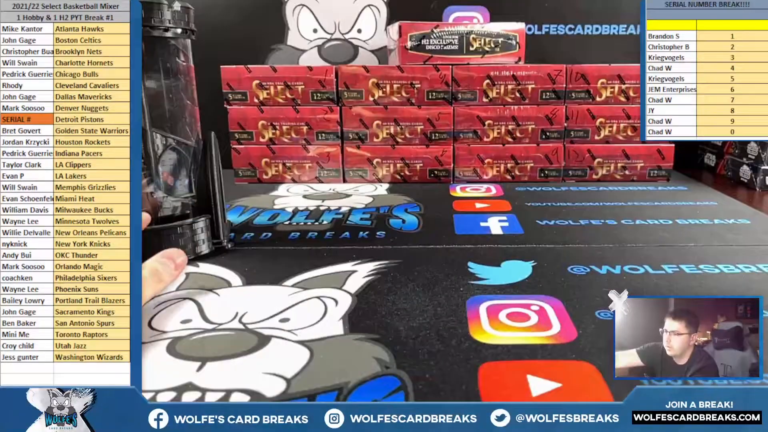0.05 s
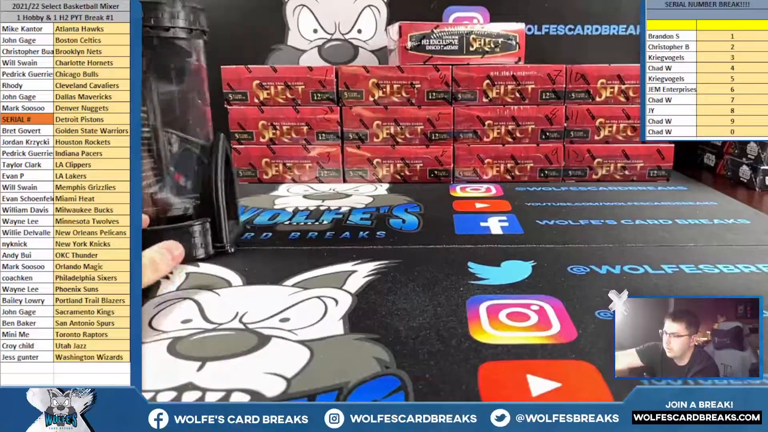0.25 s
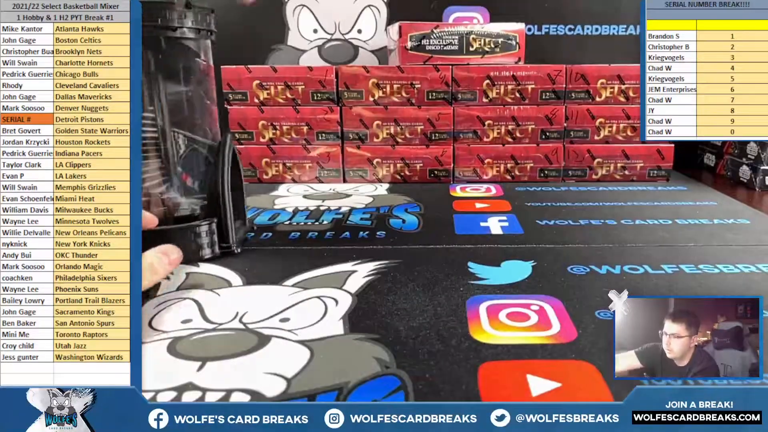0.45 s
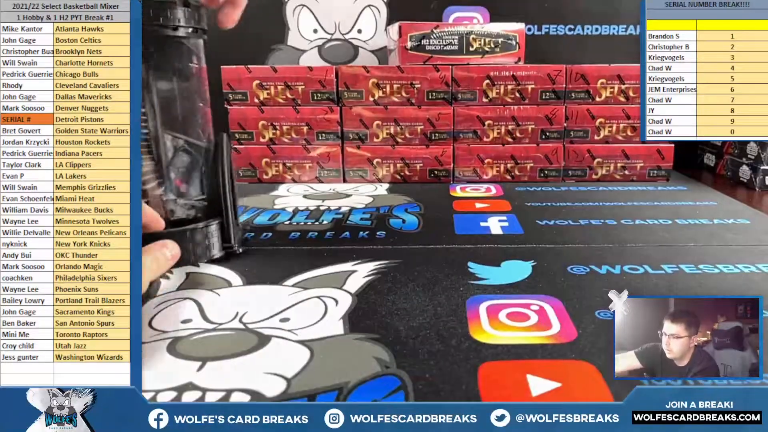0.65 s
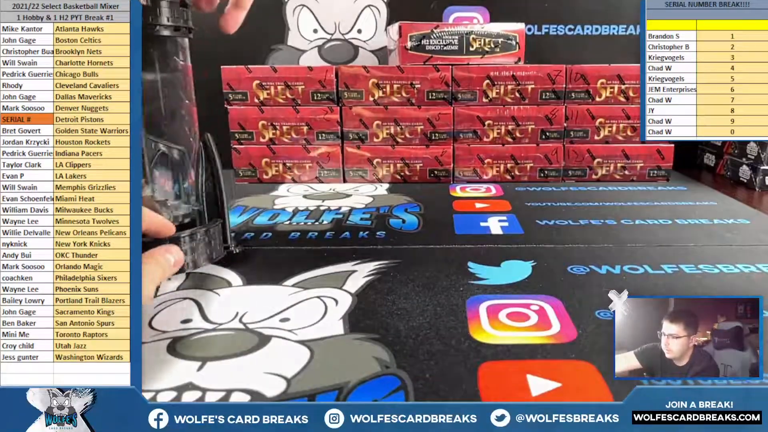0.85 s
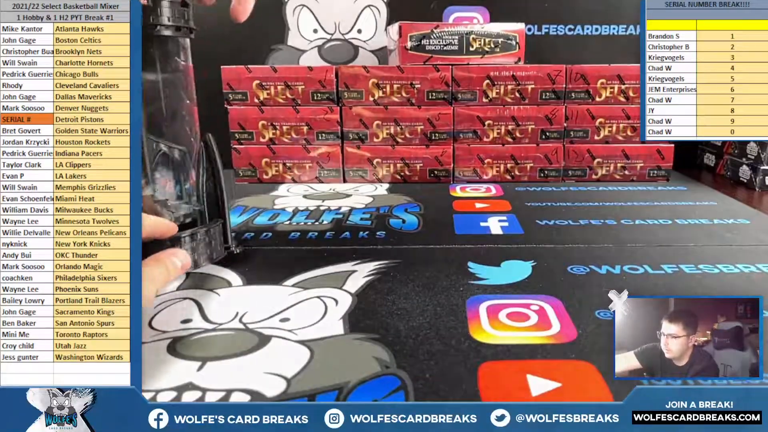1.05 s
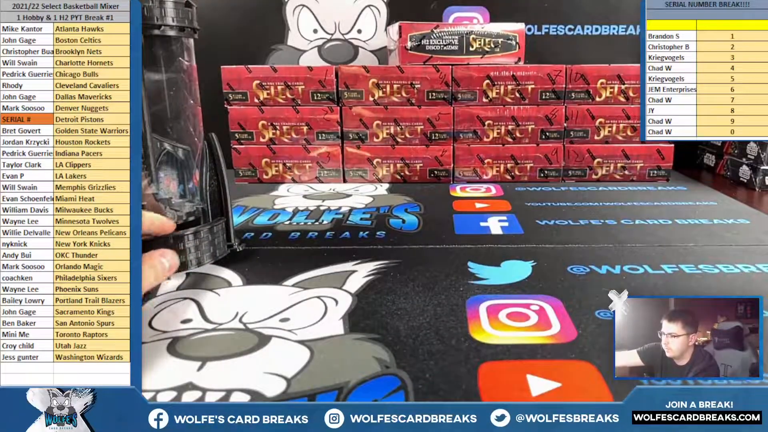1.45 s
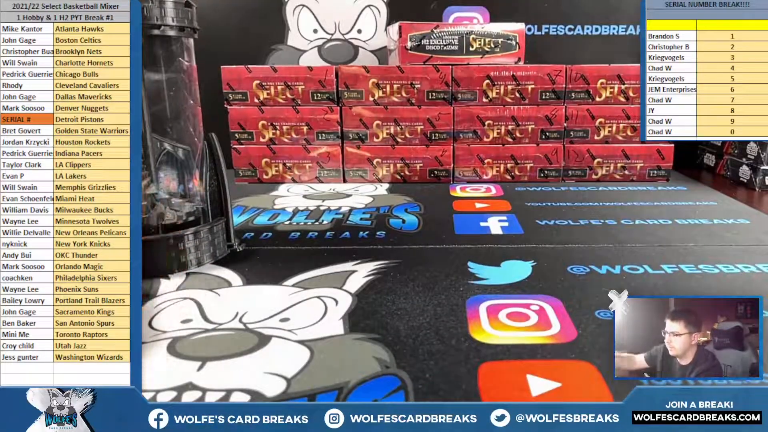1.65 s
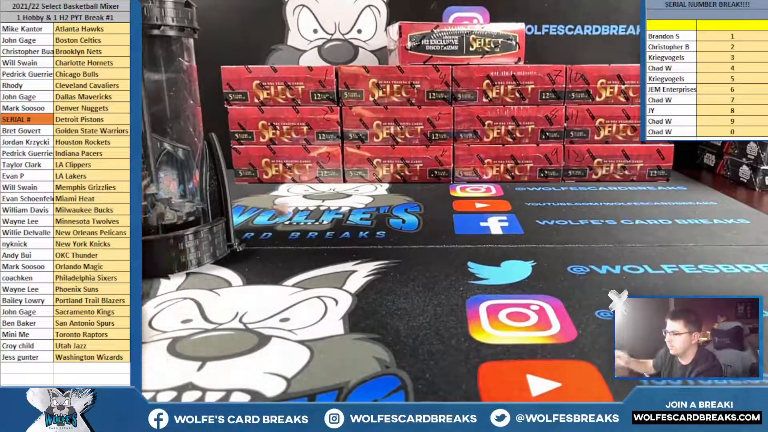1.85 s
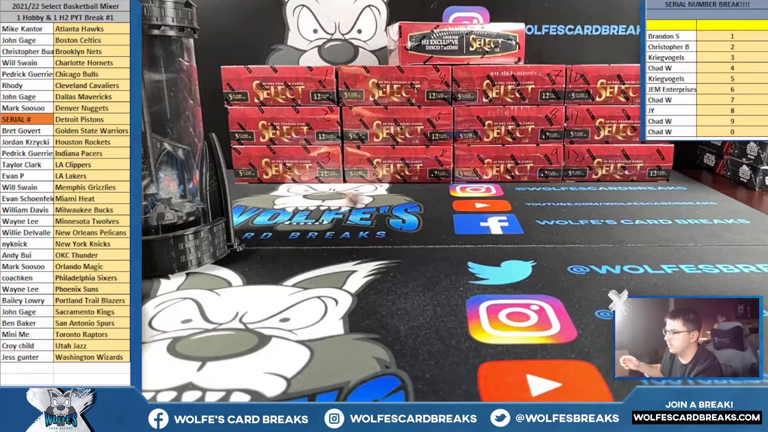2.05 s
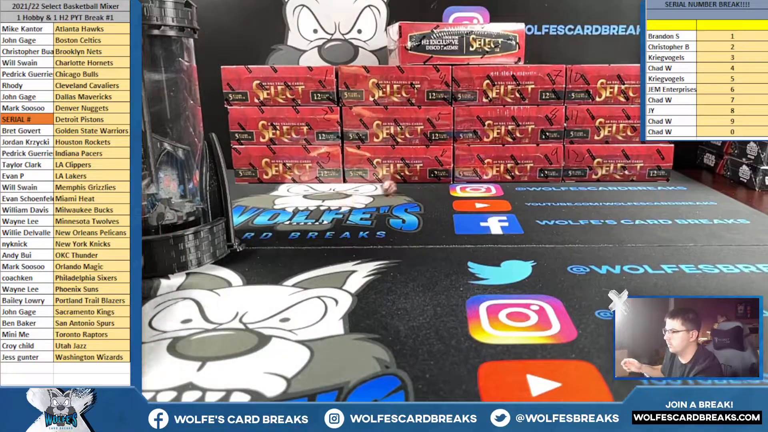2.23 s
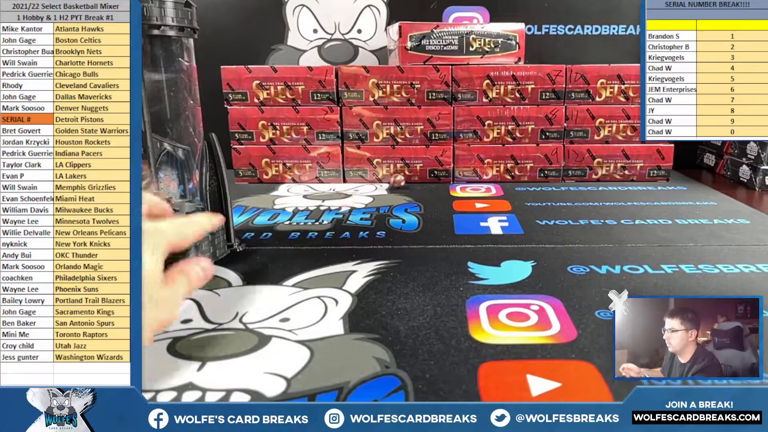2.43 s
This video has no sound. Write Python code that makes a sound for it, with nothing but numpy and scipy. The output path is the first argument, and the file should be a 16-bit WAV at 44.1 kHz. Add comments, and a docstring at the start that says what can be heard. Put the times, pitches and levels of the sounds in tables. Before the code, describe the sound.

In a small room with quiet, low background noise, one die clatters down a plastic dice tower close to the microphone. Soft finger and sleeve movements and two little taps come first. The fall is a quick run of hard, hollow knocks lasting about half a second, ending in a sharp double clack in the tray. Muffled bounces on a desk mat follow, then faint clicks and arm movement.

```python
"""Die through a dice tower

A die drops into a tall plastic tower on a desk in a small room. It knocks from baffle to baffle,
ringing the walls and the air in the shaft, cracks into the tray, then tumbles to rest on a soft mat.
Fingers rub and tap, an arm shifts, a sleeve brushes faintly; the room rumbles low."""
import sys
import numpy as np
from scipy import signal
from scipy.fft import rfft, irfft, next_fast_len
from scipy.io import wavfile

SR = 44100
rng = np.random.default_rng(int(sys.argv[2]) if len(sys.argv) > 2 else 0)


def put_to_file(sound):
    """Save the sound as 16-bit audio at rate SR, in the file named by the first command-line argument."""
    columns = np.atleast_2d(sound).T  # one column per channel
    safe = np.clip(columns, -1, 1)
    whole_steps = np.round(safe * 32767)
    wavfile.write(sys.argv[1], SR, whole_steps.astype(np.int16))


N = 109809
TIME_S = np.arange(N) / SR
AGE_S = TIME_S[:SR // 3]   # time since a contact
DROP_S, TRAY_S = 1.194, 1.627   # die meets the first baffle, reaches the tray


def from_db(db):
    return 10 ** (np.asarray(db) / 20)


def rms_one(x):
    return x / np.sqrt(np.mean(x ** 2) + 1e-20)


def at_hz(points, hz):
    """Interpolate (Hz, value) points over log frequency."""
    known_hz, values = np.transpose(points)
    return np.interp(np.log(hz + 1), np.log(known_hz), values)


def coloured(x, spectrum):
    """Minimum-phase filter through (Hz, dB) points."""
    size = 2 * next_fast_len(len(x))
    bin_hz = np.arange(size // 2 + 1) * SR / size
    cepstrum = irfft(np.log(from_db(at_hz(spectrum, bin_hz))))
    cepstrum[1:size // 2] *= 2
    cepstrum[size // 2 + 1:] = 0
    return irfft(rfft(x, size) * np.exp(rfft(cepstrum)))[:len(x)]


def noise(spectrum, size=len(AGE_S)):
    """Unit-rms noise shaped by (Hz, dB) points; one contact long by default."""
    return rms_one(coloured(rng.standard_normal(size), spectrum))


def fade(t60_s):
    return from_db(-60 * AGE_S / t60_s)


def onset(rise_s):
    return 1 - np.exp(-AGE_S / rise_s)


def ring(modes, spread_db, detune):
    """Struck modes. The spot hit sets strength and sign, and picks among close neighbours."""
    out = 0
    for (hz, db, t60_s), (loud, sharp, side) in zip(modes, rng.standard_normal((len(modes), 3))):
        gain = np.sign(side) * from_db(db + spread_db * loud)
        out = out + gain * np.sin(2 * np.pi * hz * (1 + detune * sharp) * AGE_S) * fade(t60_s)
    return out


def add(track, start_s, sound):
    start = round(start_s * SR)
    track[start:start + len(sound)] += sound[:N - start]


def swells(rows, attack_s, release_s, sag_db_per_s=0):
    """Gain curve: each swell rises to its peak, holds or sags, then dies. Overlaps add in power."""
    power = np.zeros(N)
    for peak_s, hold_s, db in rows:
        age_s = np.maximum(TIME_S - peak_s, 0)
        rise = np.exp(np.minimum(TIME_S - peak_s, 0) / attack_s)
        release = np.exp(-np.maximum(age_s - hold_s, 0) / release_s)
        power += (from_db(db - sag_db_per_s * age_s) * rise * release) ** 2
    return np.sqrt(power)


# Room noise. Each row: frequency in Hz, relative density in dB.
AMBIENCE_SPECTRUM = [(20, 9.5), (40, -15.5), (100, -6), (170, -10), (300, -15), (500, -16.5), (1000, -22.5),
                     (2500, -27), (4000, -36.5), (9000, -40), (16000, -42)]
# Swells of the rumble. Each row: peak time in seconds, hold in seconds, level in dB.
RUMBLE_RISES = [(.65, 0.15, -57.5), (1.22, 1.15, -57.5), (1.86, 0.074, -54)]


def background(rumble_hz, waver_hz, rumble_floor_db, ambience_db):
    """Steady room noise and a low rumble that wavers in pitch and level."""
    waver = noise([(8, -8), (25, -25), (100, -90)], N)
    rumble = np.sqrt(2) * np.sin(2 * np.pi * np.cumsum(rumble_hz + waver_hz * waver) / SR)
    rumble *= np.hypot(from_db(rumble_floor_db), swells(RUMBLE_RISES, attack_s=0.02, release_s=0.12))
    flutter_db = 2.2 * noise([(8, -9.5), (25, -17), (100, -82)], N)
    return from_db(ambience_db) * noise(AMBIENCE_SPECTRUM, N) + rumble * from_db(flutter_db)


# Room decay. Each row: frequency in Hz, T60 in seconds.
ROOM_DECAY = [(100, 0.5), (500, 0.3), (1500, 0.37), (3000, 0.34), (6000, 0.36), (14000, 0.17)]


def room_reflections(x, wet_db, build_s):
    """Diffuse reflections, dying faster in the treble."""
    edges_hz = np.geomspace(80, 17000, num=10)
    tail = 0
    for low, high in zip(edges_hz, edges_hz[1:]):
        bandpass = signal.butter(2, [low, high], "band", fs=SR, output="sos")
        band = signal.sosfilt(bandpass, rng.standard_normal(len(AGE_S)))
        tail = tail + band * fade(at_hz(ROOM_DECAY, np.sqrt(low * high)))
    tail *= np.clip(AGE_S / build_s - 0.5, 0, 1)
    tail /= np.sqrt(np.sum(tail ** 2))
    tail = coloured(tail, [(150, 5), (450, -3), (1200, -4.5), (5000, -2), (9000, -5.5), (12000, -6)])
    return from_db(wet_db) * signal.fftconvolve(x, tail)[:N]


# Finger strokes. Each row: peak time in seconds, hold in seconds, level in dB.
FINGER_RUBS = [(0.0022, 0.3, -65.5)]
# Rubbed plastic. Each row: frequency in Hz, bandwidth in Hz, relative level in dB.
RUB_RESONANCES = [(1330, 65, 0.5), (1600, 260, -5), (3400, 300, -8)]


def finger_rub():
    """Skin friction stirs the tower's resonances."""
    friction = rng.standard_normal(N)
    rub = 0
    for hz, width_hz, db in RUB_RESONANCES:
        rub = rub + from_db(db) * signal.lfilter(*signal.iirpeak(hz, hz / width_hz, fs=SR), friction)
    return rms_one(rub) * swells(FINGER_RUBS, attack_s=0.03, release_s=0.059, sag_db_per_s=21)


# Arm movements. Each row: peak time in seconds, hold in seconds, level in dB.
ARM_SHIFTS = [(.1, 0.19, -78), (.59, 0.023, -67), (.78, 0.086, -61.5), (1.95, .3, -67), (2.29, .2, -63.5)]
# Arm on desk. Each row: frequency in Hz, relative density in dB.
ARM_SPECTRUM = [(50, -24.5), (120, 3.5), (200, -1.5), (290, 0), (430, -2.5), (650, -13.5), (1500, -16),
                (5000, -52.5)]


def arm_on_desk(rest_db):
    """Dull noise that swells as the arm shifts on the desk."""
    moving = swells(ARM_SHIFTS, attack_s=0.036, release_s=0.023)
    return np.hypot(from_db(rest_db), moving) * noise(ARM_SPECTRUM, N)


# Sleeve movements. Each row: peak time in seconds, hold in seconds, level in dB.
SLEEVE_SWISHES = [(0.13, 0.14, -67), (.61, 0.22, -60), (1.05, .2, -72), (2.475, .02, -65)]
# Brushing cloth. Each row: frequency in Hz, relative density in dB.
CLOTH_SPECTRUM = [(200, 1), (1000, -3), (2500, 6), (4200, 1), (6200, 4.5), (9000, 1.5), (13000, -1),
                  (16000, -12.5)]


def sleeve(rest_db):
    """Cloth swishes, and stirs faintly while the hand holds the die."""
    holding = from_db(rest_db) * (TIME_S < DROP_S)
    moving = swells(SLEEVE_SWISHES, attack_s=0.066, release_s=0.015, sag_db_per_s=19.5)
    return np.hypot(holding, moving) * noise(CLOTH_SPECTRUM, N)


# Taps on tower and desk. Each row: start in seconds, touch level in dB, click level in dB.
LIGHT_TAPS = [(0.773, -56, -57), (0.817, -61.5, -54), (1.935, -54.5, -68), (2.003, -60.5, -63),
              (2.119, -75, -58), (2.246, -69, -57), (2.404, -54, -61), (2.417, -55.5, -66)]
# Soft contact, for taps and mat. Each row: frequency in Hz, relative density in dB.
THUD_SPECTRUM = [(60, -11), (300, -0.5), (600, -2), (1000, -5), (1500, -14.5), (3000, -13.5), (8000, -33),
                 (16000, -51)]


def light_taps():
    """Short dull touches and small clicks, from the settling die and the hand."""
    out = np.zeros(N)
    click_spectrum = [(800, -24), (1700, 8), (2500, 11), (3200, -3), (4200, -36), (12000, -53)]
    for start_s, touch_db, click_db in LIGHT_TAPS:
        touch = from_db(touch_db) * noise(THUD_SPECTRUM) * fade(t60_s=0.1)
        click = from_db(click_db) * noise(click_spectrum) * fade(t60_s=0.029)
        add(out, start_s, (touch + click) * onset(rise_s=0.0022))
    return out


# Die on the mat. Each row: start in seconds, strength in dB.
MAT_BOUNCES = [(1.7512, -36), (1.7747, -41), (1.847, -41.5), (1.934, -51.5), (1.9610, -61)]
# Desk under the mat. Each row: frequency in Hz, relative level in dB, T60 in seconds.
DESK_RESONANCES = [(68, -10.5, 0.89), (188, -18, 0.13), (332.5, -11, 0.2), (412, -11, 0.19),
                   (574, -4.5, 0.19), (608, -7.5, 0.16), (881, 6.5, 0.042)]


def mat_bounces():
    """The mat softens each contact to a thud that rings the desk."""
    out = np.zeros(N)
    for start_s, db in MAT_BOUNCES:
        desk = from_db(-3.5) * ring(DESK_RESONANCES, spread_db=1.5, detune=0.01)
        thud = noise(THUD_SPECTRUM) * fade(t60_s=0.073)
        add(out, start_s, from_db(db) * (thud + desk) * onset(rise_s=0.0028))
    soft_contact = signal.butter(3, 1700, fs=SR, output="sos")   # a long contact carries no treble
    return signal.sosfilt(soft_contact, out)


# Air in the shaft. Each row: frequency in Hz, relative level in dB, T60 in seconds.
AIR_MODES = [(379.6, -10, 0.083), (419, 0.5, 0.057), (453.6, -5.5, 0.16)]


def hollow_body(hits, thump_db, rise_s):
    """Each hit rings the shaft's air and sends a low thump through the tower's foot to the desk."""
    out = np.zeros(N)
    foot_spectrum = [(40, -5), (110, -1.5), (180, -2), (260, -12.5), (900, -58.5)]
    for start_s, strength_db, air_db, *_ in hits:
        air = from_db(air_db) * ring(AIR_MODES, spread_db=3.5, detune=0.0034)
        thump = from_db(thump_db) * noise(foot_spectrum) * fade(t60_s=0.18)
        add(out, start_s, from_db(strength_db) * (air + thump) * onset(rise_s))
    return out


def plastic_hits(hits, modes, crowd_spectrum, modes_db, crowd_db, crack_t60_s, rise_s, tick_db, snap_db):
    """Die on plastic: a tick, a crack, a crowd of short modes and the panel's clear modes."""
    out = np.zeros(N)
    crowd_decay = from_db(crowd_db) * fade(t60_s=0.064)
    crack_decay = from_db(-7.5) * fade(crack_t60_s)
    tick_spectrum = [(2000, -11), (5500, -10), (9000, 5), (14000, -0.5), (16000, -5)]
    for start_s, strength_db, _, full_db, sharp_db in hits:
        crowd = noise(crowd_spectrum) * (crowd_decay + crack_decay)
        clear = from_db(modes_db) * ring(modes, spread_db=2, detune=0.0024)
        panel = (crowd + clear) * onset(rise_s)   # bending waves take time to spread
        depth_db = np.interp(start_s, [DROP_S, TRAY_S], [-3, 3])   # deeper as the die falls
        # A face in mid-panel gives a full knock, an edge a thin snap.
        knock_eq = [(300, 0), (800, full_db + depth_db), (1150, full_db - depth_db), (1900, 0.0025)]
        snap_eq = [(3500, 0.01), (5000, snap_db + 0.74 * sharp_db), (12000, sharp_db / 2)]
        panel = coloured(panel, knock_eq + snap_eq)
        # The die itself ticks, loudest on a corner.
        tick = from_db(tick_db + sharp_db) * noise(tick_spectrum) * fade(t60_s=0.0062)
        add(out, start_s, from_db(strength_db) * (panel + tick))
    return out


# Die in the tray. Each row: start in seconds, then strength, relative air, fullness, sharpness in dB.
TRAY_HITS = [(1.6274, -17.5, -11, -4, -4.5), (1.6605, -24.5, -15.5, 1, -2.5)]
# Tray's clear modes. Each row: frequency in Hz, relative level in dB, T60 in seconds.
TRAY_RESONANCES = [(766, -6, 0.14), (1174, -5, 0.04), (1868, 8, 0.046), (2706, 16, 0.023), (3110, -5, .035),
                   (3720, 2, 0.036), (4560, 0, 0.076), (4620, -24, 0.46), (5400, -8, 0.019),
                   (5520, -10, 0.13)]
# Tray's crowd of short modes. Each row: frequency in Hz, relative density in dB.
TRAY_CROWD = [(100, -39.5), (300, -20.5), (600, -19), (1000, -1), (1450, -7.5), (1900, 4.5), (2200, -2.5),
              (2750, -0.5), (3400, -4.5), (5200, -1.5), (6100, -10), (9200, -12.5), (11000, -25.5),
              (16000, -27.5)]


def tray_landings():
    """The die cracks into the tray and sets it ringing."""
    return plastic_hits(TRAY_HITS, TRAY_RESONANCES, TRAY_CROWD, modes_db=-12, crowd_db=-0.5,
                        crack_t60_s=0.034, rise_s=0.00082, tick_db=-14.5, snap_db=-2)


# Die in the tower. Each row: start in seconds, then strength, relative air, fullness, sharpness in dB.
BAFFLE_HITS = [(1.1292, -49.5, -3, -3.5, 1), (1.1940, -21.5, -4.5, 1, 2), (1.2533, -38, 0, 9.5, 15),
               (1.2784, -23.5, -8.5, 0, -3.5), (1.3235, -24.5, -2, -1, -3), (1.3335, -31, -3, 2, 4),
               (1.3752, -43.5, 18, 8.5, 13.5), (1.3962, -23, -5.5, -3, 0.5), (1.4158, -25, -10, 0, -4.5),
               (1.4573, -42, 13, 9.5, 10.5), (1.4850, -22.5, 0.5, 3, -4.5), (1.5283, -36.5, 11, -1.5, 9.5),
               (1.5520, -27, -8.5, 6.5, 5), (1.5682, -32, 4.5, 7, 4.5), (1.5730, -23, 3, -3.5, 4.5)]
# Clear modes of walls and baffles. Each row: frequency in Hz, relative level in dB, T60 in seconds.
WALL_RESONANCES = [(591.6, -7.5, 0.086), (770, -27, 0.25), (1001, -7.5, .09), (1000, -11, 0.046),
                   (1157, -21, 0.17), (1383, -9, 0.13), (1578, -4.5, 0.14), (1667, -7, 0.089),
                   (1838, -8, 0.015), (1996, 3, 0.043), (2450, -23, .05), (2459, -6.5, 0.063),
                   (2775, -3, 0.033), (3060, -12, 0.079), (3080, -17.5, 0.041), (3548, -3, 0.043),
                   (4320, -11, 0.055), (8100, -24.5, 0.036)]
# Walls' crowd of short modes. Each row: frequency in Hz, relative density in dB.
WALL_CROWD = [(100, -20), (300, -18), (600, -11.5), (820, -1), (1020, -2), (2000, 0), (3400, -5),
              (4500, -8.5), (7000, -12), (9200, -18), (10800, -26.5), (13500, -24.5), (16000, -41.5)]


def baffle_knocks():
    """The die falls from baffle to baffle, ringing the walls."""
    return plastic_hits(BAFFLE_HITS, WALL_RESONANCES, WALL_CROWD, modes_db=-8, crowd_db=-2.5,
                        crack_t60_s=0.044, rise_s=0.0011, tick_db=-13, snap_db=-6)


def scene():
    """Tower, tray, mat and hand in the room, mono."""
    walls = baffle_knocks()
    tray = tray_landings()
    desk = mat_bounces() + light_taps()
    hollow = hollow_body(BAFFLE_HITS + TRAY_HITS, thump_db=-28, rise_s=0.0047)
    # Tray and shaft mouth face the listener, so they sound drier than the walls.
    room_send = walls + desk + from_db(-1.5) * tray + from_db(-1) * hollow
    reflections = room_reflections(room_send, wet_db=-4.5, build_s=0.0075)
    handling = finger_rub() + arm_on_desk(rest_db=-70) + sleeve(rest_db=-77.5)
    ambience = background(rumble_hz=63.9, waver_hz=3.3, rumble_floor_db=-64.5, ambience_db=-58.5)
    return (walls + tray + desk + hollow + reflections + handling + ambience)[None]


def record(dry):
    """Steep low-pass at 16 kHz."""
    return signal.sosfilt(signal.ellip(10, 0.1, 70, 16000, fs=SR, output="sos"), dry)


dry = scene()
out = record(dry)
put_to_file(out)
```